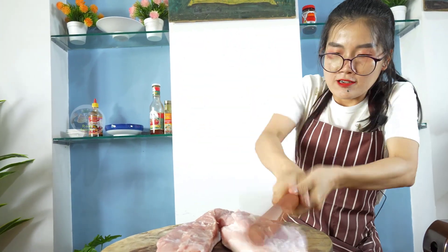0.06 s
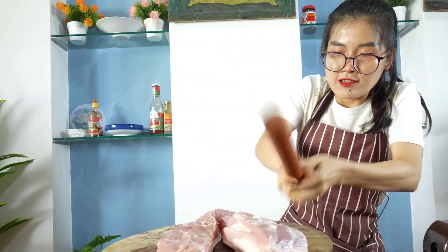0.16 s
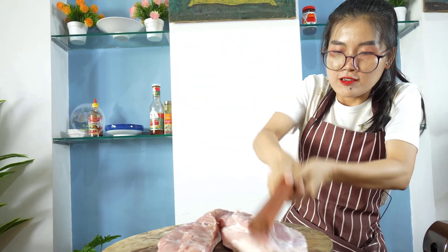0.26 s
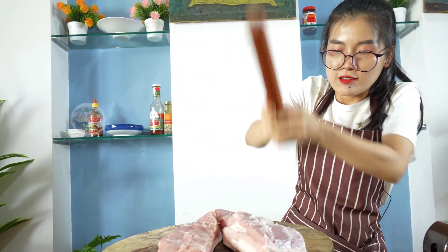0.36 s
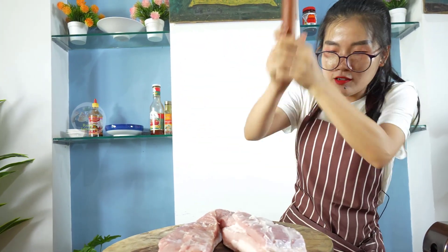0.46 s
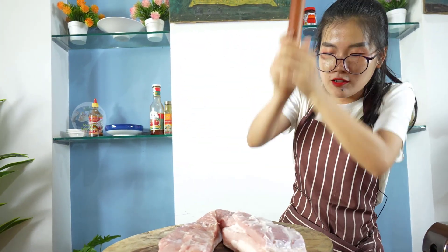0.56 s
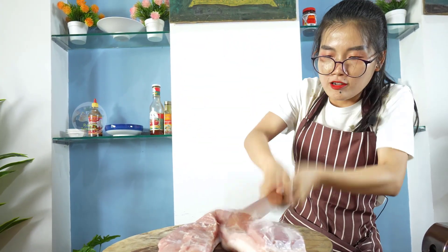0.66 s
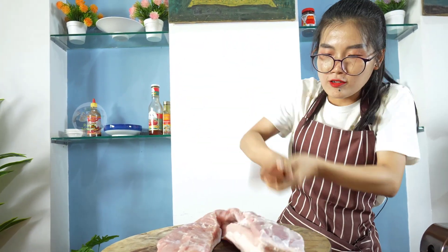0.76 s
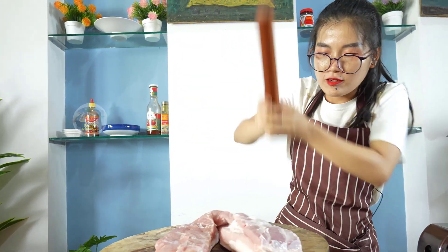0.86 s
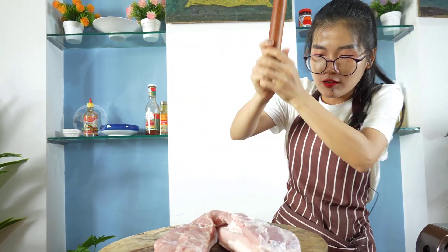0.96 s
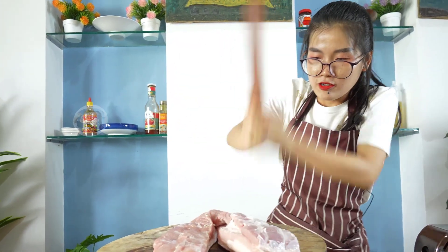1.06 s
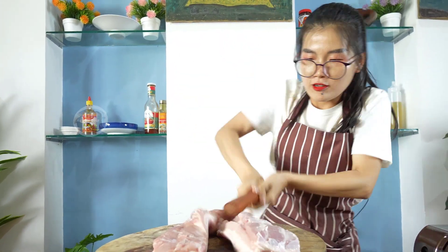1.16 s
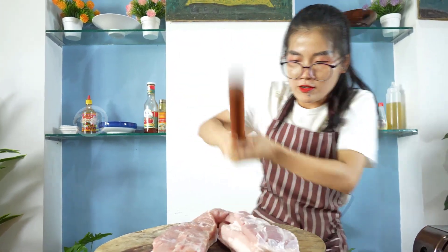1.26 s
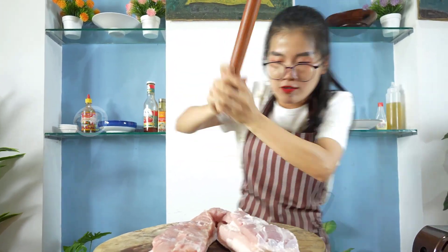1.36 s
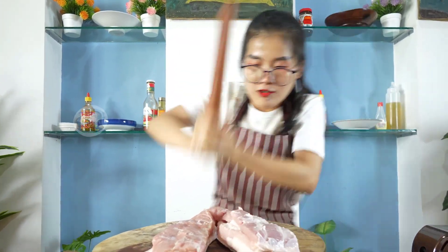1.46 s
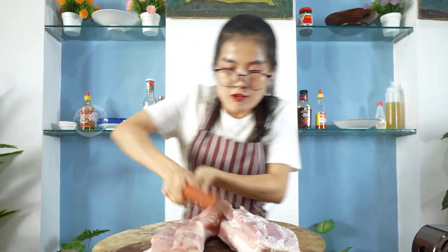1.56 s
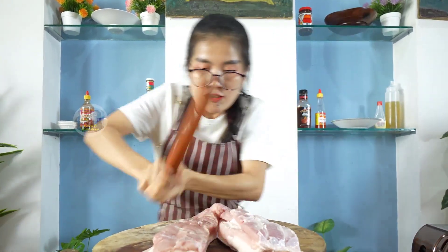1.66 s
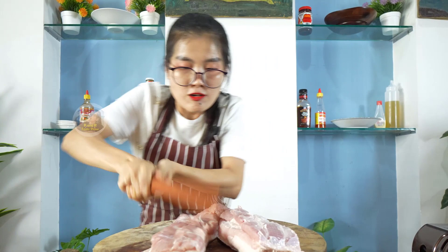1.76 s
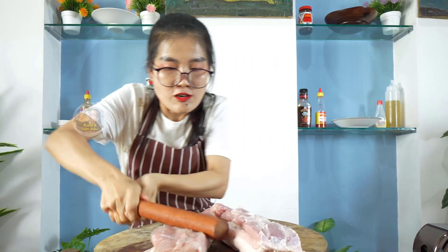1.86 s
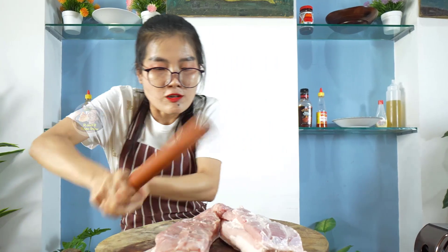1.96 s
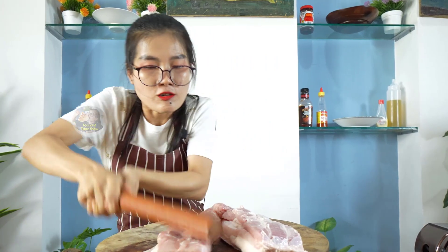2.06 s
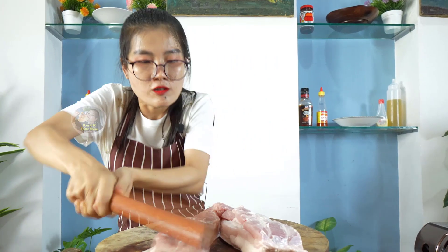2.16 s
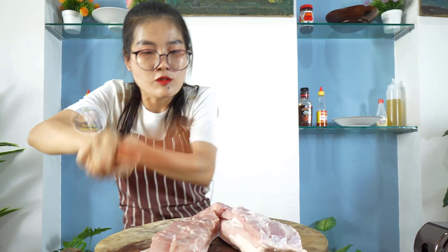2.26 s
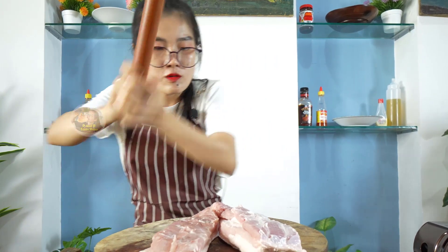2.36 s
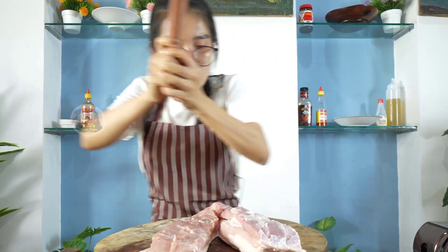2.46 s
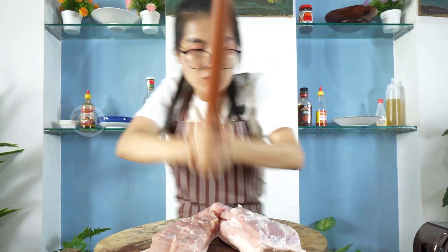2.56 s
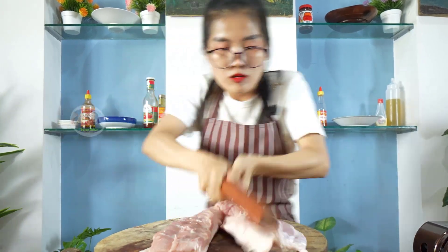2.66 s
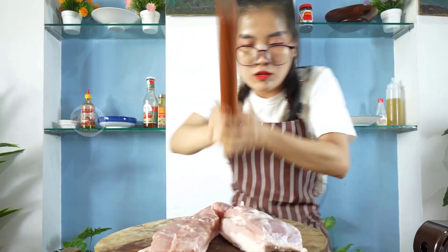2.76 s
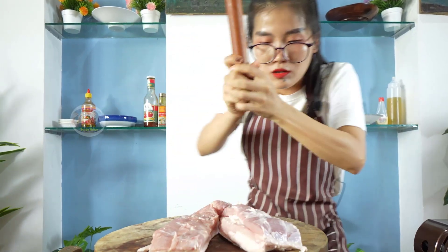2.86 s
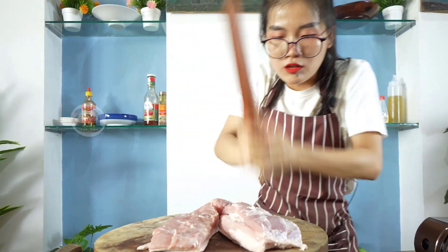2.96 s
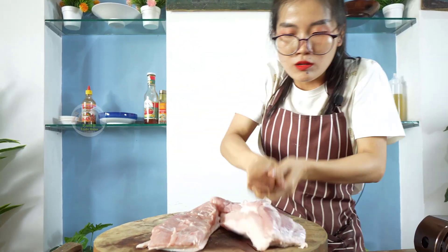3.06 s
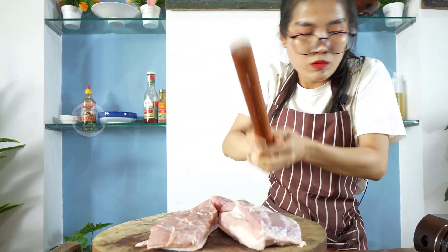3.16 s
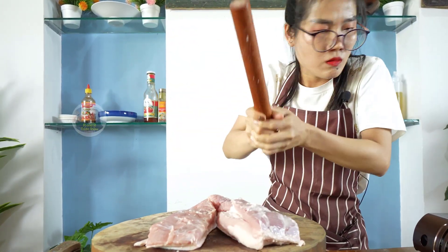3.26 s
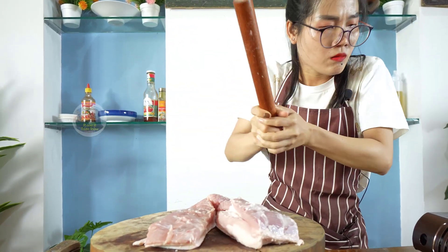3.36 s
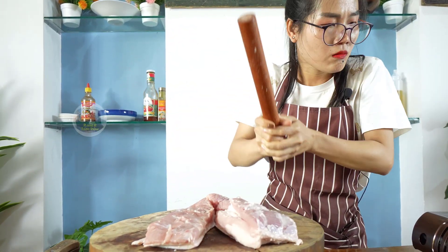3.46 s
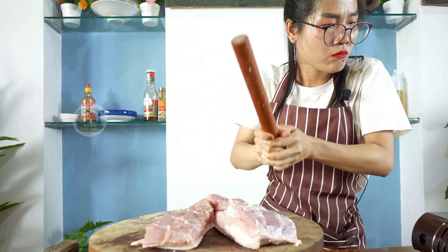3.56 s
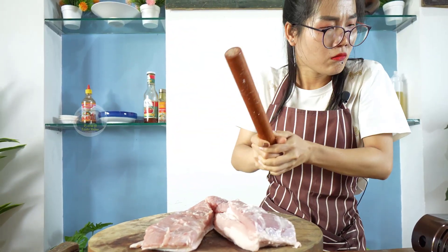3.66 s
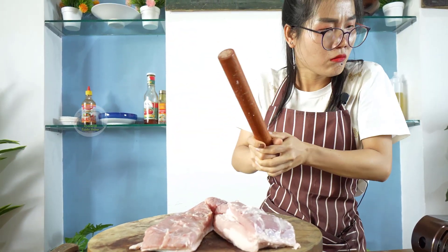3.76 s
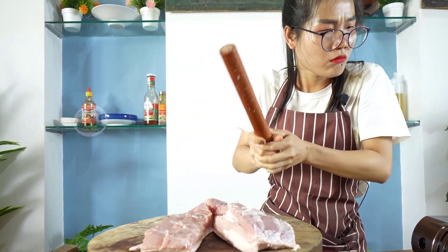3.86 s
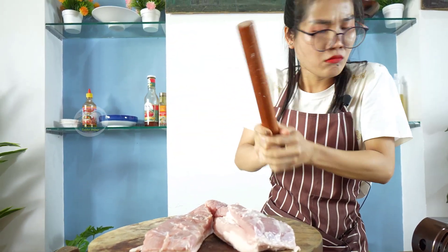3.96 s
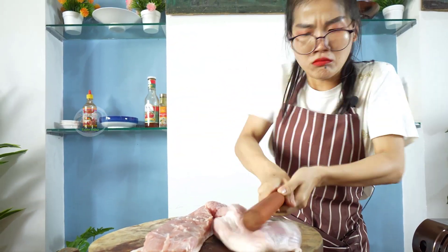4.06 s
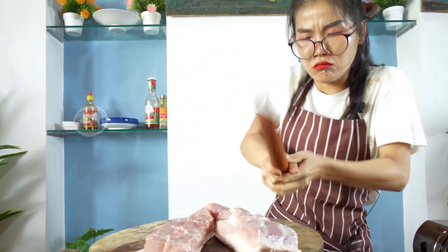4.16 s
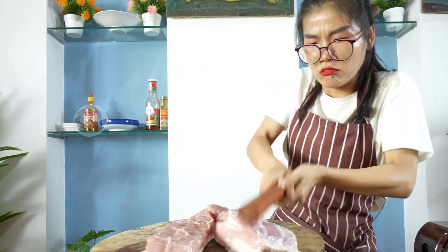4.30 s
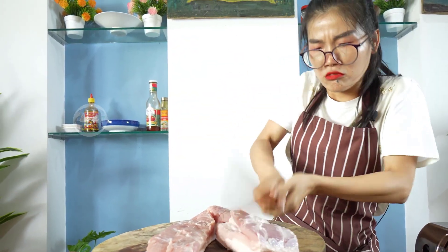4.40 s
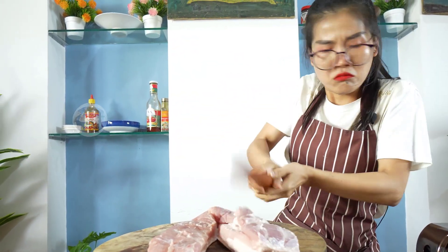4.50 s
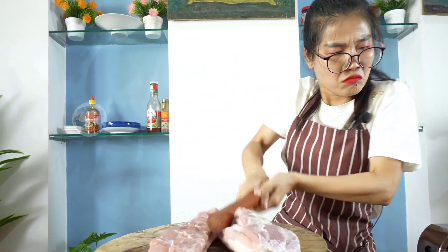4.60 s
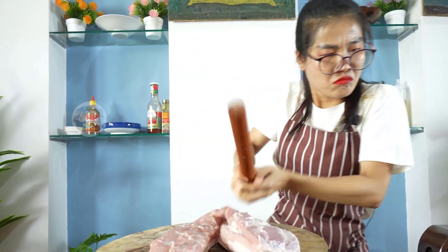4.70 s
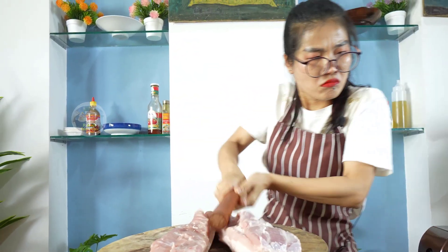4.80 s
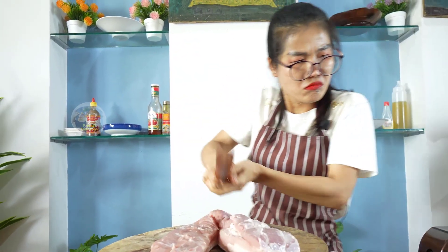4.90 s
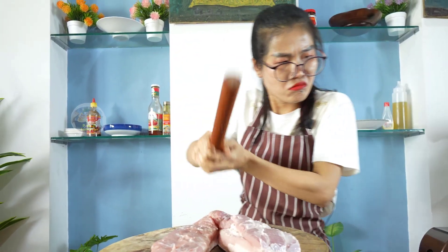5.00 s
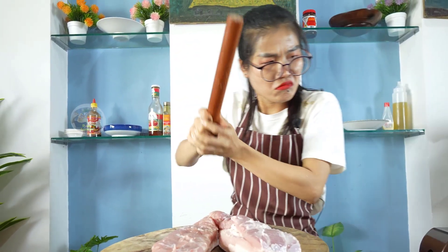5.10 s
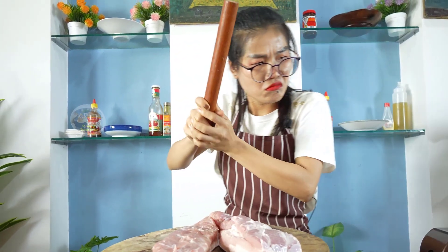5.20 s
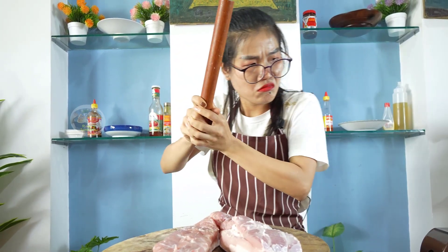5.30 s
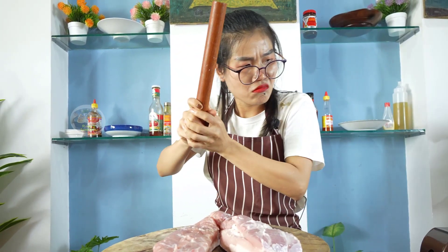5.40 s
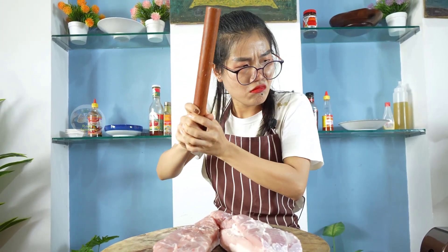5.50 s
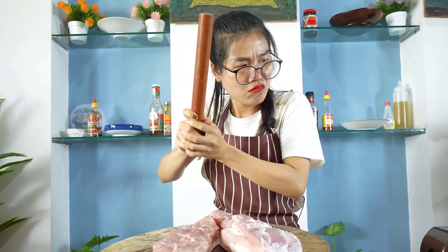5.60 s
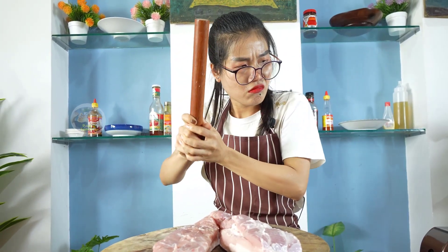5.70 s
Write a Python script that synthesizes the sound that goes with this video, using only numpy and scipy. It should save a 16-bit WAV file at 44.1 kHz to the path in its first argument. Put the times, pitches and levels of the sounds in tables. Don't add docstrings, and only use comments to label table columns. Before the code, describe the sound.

Wet, sharp slaps of a wooden pin on raw meat come in bursts, with a loose wooden block chattering and rattling in a tiled kitchen.

```python
import sys
import numpy as np
from scipy import signal
from scipy.fft import rfft, irfft, next_fast_len
from scipy.io import wavfile
from scipy.ndimage import map_coordinates

SR = 44100
rng = np.random.default_rng(int(sys.argv[2]) if len(sys.argv) > 2 else 0)


def waveform_to_disk(signal):
    frames = np.transpose(np.atleast_2d(signal))
    scaled = np.clip(frames, -1, 1) * 32767
    samples = np.round(scaled).astype(np.int16)
    wavfile.write(sys.argv[1], SR, samples)


def volts_from_decibels(level):
    exponent = np.asarray(level, float) / 20
    return 10 ** exponent


N = 253069


def unit(x):
    return x / np.sqrt(np.mean(x ** 2) + 1e-20)


def peak(x):
    return x / np.abs(x).max()


def add(track, s, sound):
    track[round(s * SR):][:len(sound)] += sound


def along(points, hz):
    f, v = np.transpose(points)
    return np.interp(np.log(hz + 1), np.log(f + 1), v, left=-120, right=-120)


def coloured(x, spectrum):
    m = next_fast_len(len(x) + 8192)
    gain = volts_from_decibels(along(spectrum, np.fft.rfftfreq(m, 1 / SR)))
    return unit(irfft(rfft(x, m) * gain, m)[:len(x)])


def below(x, hz):
    m = next_fast_len(N + 8192)
    return irfft(rfft(x, m) * (np.fft.rfftfreq(m, 1 / SR) < hz), m)[..., :N]


def ring(modes, t, attack, scatter_db, spread=.005):
    hz, db, t60 = np.transpose(modes)[:, :, None]
    chance = rng.standard_normal((2, len(modes), 1))
    decay = volts_from_decibels(db + scatter_db * chance[0] - 60 * t / t60)
    tones = decay * np.sin(2 * np.pi * hz * (1 + spread * chance[1]) * t)
    return tones.sum(axis=0) * (1 - np.exp(-t / attack))


def grains(fresh, per_s, spread_db, life, smooth):
    sizes = np.minimum(rng.exponential(size=N), 2.2)
    taps = (rng.random(N) < per_s / SR) * volts_from_decibels(spread_db * sizes)
    t = np.arange(SR // 40) / SR
    rubs = np.sqrt(np.abs(signal.fftconvolve(taps ** 2, volts_from_decibels(-120 * t / life))[:N]))
    power = fresh ** 2 * unit(rubs) ** 2 + 1 - fresh ** 2 + smooth ** 2
    return np.sqrt(power) * rng.standard_normal(N)


# time of the blow in seconds, strength in dB, rise in dB/s.
SWINGS = [
    (.7365, -4, 150),
    (1.1854, 0.5, 155.5),
    (1.5854, 1.5, 110.5),
    (2.677, 0.5, 155),
    (3.08, 2.5, 97),
    (4.125, -5, 252),
]
# chatter, boom, crunch and hiss in dB, swelling in seconds.
JOLTS = [(-38.5, -31, -30, -47, 0.055), (-31.5, -24.5, -32, -54, 0.073), (-38.5, -27, -26.5, -55, 0.11),
         (-25.5, -22, -26.5, -54.5, 0.11), (-21, -18, -22.5, -39, 0.079), (-27, -21.5, -24, -39, 0.076),
         (-22, -19, -25.5, -39.5, 0.052), (-23, -19, -28.5, -45.5, 0.076),
         (-24, -17.5, -24.5, -45.5, 0.069), (-25.5, -18.5, -32, -53.5, 0.054),
         (-22, -23.5, -23, -43.5, 0.091), (-23.5, -20.5, -19.5, -47, 0.12), (-40, -29, -28, -45.5, 0.053),
         (-31, -26, -30, -40, 0.072), (-35.5, -29.5, -33, -51, 0.034), (-38.5, -59, -41.5, -48.5, 0.083),
         (-34, -32.5, -34.5, -60, 0.084)]
# chatter, boom, crunch, hiss.
# Start below the top in dB; fall in dB/s; share of the swelling time (spray peaks early).
SWELL_DB = [7.3, 5.5, 0.79, 7.8]
FALL_DB_S = [97, 120, 110, 95]
SWELL_SHARE = [0.69, 0.86, 1, 0.34]
SWING_DB = [-44, -38, -44.5, -67]
REST_DB = [-74, -66, -76, -99.5]
LINGER_DB = [-12, -21.5, -40.5, -42]
LINGER_DB_S = [50, 50, 55.2, 95]


def shake(column):
    step = 32
    t, k = np.arange(0, N + step, step) / SR, column - 1
    calm = volts_from_decibels(2 * REST_DB[k])
    for s, db, rise in SWINGS:
        calm = calm + (t < s) * volts_from_decibels(2 * (SWING_DB[k] + db - rise * np.abs(t - s)))
    busy = np.zeros_like(t)
    earlier_s = -0.027
    for s, jolt in zip([earlier_s] + [row[0] for row in SLAPS], JOLTS):
        top_s = max(SWELL_SHARE[k] * jolt[-1], .005)
        swell = np.clip(1 - (t - s) / top_s, 0, 1)
        late = np.maximum(t - s - top_s, 0)
        power = (t >= s) * volts_from_decibels(2 * (jolt[k] - SWELL_DB[k] * swell))
        busy += power * volts_from_decibels(-2 * FALL_DB_S[k] * late)
        calm += power * volts_from_decibels(2 * (LINGER_DB[k] - LINGER_DB_S[k] * late))
    return [np.interp(np.arange(N) / SR, t, v) for v in (np.sqrt(busy + calm), busy / (busy + calm))]


# time in seconds, table boom in dB, rustle in dB.
STIRS = [
    (.56, -45.5, -71),
    (.64, -56.5, -46),
    (2.5, -42.5, -71.5),
    (2.999, -51, -64.5),
    (3.8, -58, -81),
    (3.95, -56.5, -77),
    (5.299, -59, -71),
    (5.54, -57.5, -78),
]
STIR_DB_S = [89.5, 297.5]


def stir(column):
    t = np.arange(N) / SR
    return sum(volts_from_decibels(row[column] - STIR_DB_S[column - 1] * np.abs(t - row[0])) for row in STIRS)


# frequency in Hz, density in dB per Hz.
HUM = [(13, -35), (22, -6.5), (76, -8.5), (109, -18.5), (140, -1), (165, -19.5), (242, -16), (356, -41.5),
       (602, -22), (653, -46), (1100, -38.5), (1580, -60.5), (16000, -82.5)]


def hum():
    level_db, wavers_db = -60, 4.5
    waver = map_coordinates(rng.standard_normal(40), [np.arange(N) * 6 / SR])
    return volts_from_decibels(level_db + 8.0 + wavers_db * waver) * coloured(rng.standard_normal(N), HUM)


# frequency in Hz, t60 in seconds.
KITCHEN = [(100, .5), (400, .3), (1000, .34), (3000, .3), (7000, .28), (14000, .26)]


def kitchen(x, decays, piece=.3):
    out, step = np.zeros(N + 2 * SR), round(piece * SR)
    for start in range(0, N, step):
        hz, t, z = signal.stft(rng.standard_normal(SR * 3 // 4), SR, nperseg=256)
        t60 = along(decays, np.clip(hz, decays[0][0], decays[-1][0]))
        tail = signal.istft(z * volts_from_decibels(-60 * t / t60[:, None]), SR, nperseg=256)[1]
        echo = signal.fftconvolve(x[start:start + step], tail / np.linalg.norm(tail))
        add(out, start / SR + .006, echo)
    return out[:N]


# frequency in Hz, width in Hz, level in dB.
DISHES = [(900, 180, -7), (1580, 99, -13.5), (2250, 100, -11), (2580, 130, -8), (3050, 180, -4),
          (3270, 140, -4.5), (3587, 50, -3), (4310, 130, -2), (4560, 80, -4), (5330, 80, -7),
          (6600, 120, -9.5), (7200, 100, -10)]
# frequency in Hz, t60 in seconds.
DISH_RING = [(100, .5), (900, 0.46), (2400, 0.45), (3300, .52), (4400, 0.39), (5500, 0.36), (14000, 0.31)]


def dishes(shaken):
    m = next_fast_len(N + 8192)
    f = np.fft.rfftfreq(m, 1 / SR)
    bands = sum(volts_from_decibels(db) / (1 + (2 * (f - hz) / width) ** 2) for hz, width, db in DISHES)
    return volts_from_decibels(-4.5) * kitchen(irfft(rfft(shaken, m) * bands, m)[:N], DISH_RING)


# frequency in Hz, density in dB per Hz.
BOOM = [(13, -52.5), (22, -8.5), (43, -18), (88, -3), (110, -8.5), (133, 0), (160, -10), (247, -5),
        (330, -7), (420, -8.5), (474, -0.5), (540, -9.5), (700, -13.5), (1000, -100)]
RUMBLE = [(13, -39.5), (25, -7.5), (60, -0.5), (130, 0), (220, -8), (320, -18), (600, -60)]


def table():
    boom = shake(column=2)[0] * volts_from_decibels(-3.5) * coloured(rng.standard_normal(N), BOOM)
    return boom + stir(column=1) * coloured(rng.standard_normal(N), RUMBLE)


# start in seconds, peak in dB, frequency in Hz.
BUMPS = [(.141, -27, 70), (0.738, -22, 67), (1.19, -46.5, 90), (1.589, -27, 90), (1.776, -24.5, 110),
         (1.93, -15, 110), (2.083, -18.5, 130), (2.241, -14, 150), (2.679, -25, 70), (3.086, -23, 90),
         (4.127, -27, 70), (4.313, -30, 70), (5.503, -40, 40.2)]


def bumps():
    out, t = np.zeros(N + SR), np.arange(SR // 8) / SR
    cycles = 1.3
    for s, db, hz in BUMPS:
        swing = ring([(hz, 0, 2 * cycles / hz)], t, attack=0.0025, scatter_db=0)
        add(out, s, -volts_from_decibels(db) * peak(swing))
    return out[:N]


# frequency in Hz, density in dB per Hz.
SWISH = [(3500, -41), (5500, -1.5), (7000, -3.5), (10000, -7), (13000, -14), (15600, -17), (16000, -80)]
# start in seconds, peak in dB.
SPITS = [(0.214, -24), (0.295, -27.5), (0.6275, -48), (1.8088, -41.5), (2.6925, -21.5), (2.7274, -22),
         (3.0835, -18), (3.12, -38), (3.137, -22.5), (3.1767, -20.5), (3.2156, -18), (4.3441, -41)]


def swish():
    out, t = np.zeros(N + SR), np.arange(SR // 8) / SR
    for s, db in SPITS:
        envelope = (1 - np.exp(-t / 0.0011)) * volts_from_decibels(-60 * t / 0.063)
        puff = envelope * coloured(rng.standard_normal(len(t)), SWISH)
        add(out, s, volts_from_decibels(db - 2.0) * peak(puff))
    gain, fresh = shake(column=4)
    spray = grains(fresh, per_s=320, spread_db=3.5, life=.03, smooth=1.7)
    return out[:N] + gain * volts_from_decibels(5.5) * coloured(spray, SWISH)


# frequency in Hz, density in dB per Hz.
CRUNCH = [(350, -43.5), (550, -3), (1200, 2), (1800, -4.5), (2500, -1.5), (3600, -4.5), (3900, -10),
          (4500, -10.5), (5200, -16), (7500, -21), (10000, -36)]


def crunch():
    gain, fresh = shake(column=3)
    crackle = grains(fresh, per_s=350, spread_db=3.5, life=0.04, smooth=0.39)
    return (gain + stir(column=2)) * volts_from_decibels(-4.5) * coloured(crackle, CRUNCH)


# frequency in Hz, density in dB per Hz.
CHATTER = [(300, -48), (520, -11), (680, -3.5), (780, -1.5), (900, -4), (1020, -4.5), (1150, -2.5),
           (1500, -5), (2200, -12.5), (3500, -33), (6000, -71.5)]


def chatter():
    gain, fresh = shake(column=1)
    contacts = grains(fresh, per_s=680, spread_db=-2.0, life=0.0099, smooth=0.21)
    return gain * volts_from_decibels(1.0) * coloured(contacts, CHATTER)


# frequency in Hz, level in dB, t60 in seconds.
BLOCK_LOW = [(488, -7, 0.015), (770, -8.5, 0.056), (825.2, 0.5, 0.05), (899, 2, 0.041),
             (959.7, -0.5, 0.048), (1040, -4, .03), (1124, -4, 0.019), (1370, -11.5, 0.025),
             (1611, -8.5, 0.041)]
BLOCK_HIGH = [(2370, -16, 0.0043), (2472, -0.5, 0.021), (3080, -8.5, 0.022), (3561, -9, 0.044),
              (4292, -4.5, 0.021), (4586, -9.5, 0.039), (5213, -13.5, 0.039), (6000, -27, 0.017),
              (6700, -17, 0.028), (7970, -25.5, 0.039), (9050, -24, 0.028)]
# frequency in Hz, density in dB per Hz.
EDGE = [(700, -38), (1500, 0.5), (3000, 0), (5000, -10.5), (6000, -22.5), (7000, -19.5), (10000, -32),
        (12000, -41), (15500, -47), (16000, -88.5)]
# start in seconds, peak in dB, upper modes in dB re peak, favoured body pitch in Hz.
LANDINGS = [(0.046, -24.5, -13, 791), (0.058, -13, -11.5, 880), (0.1, -30.5, 1.5, 805),
            (0.152, -20.5, -12.5, 956), (0.167, -13, -21.5, 895), (0.186, -15.5, -10.5, 810),
            (0.198, -11, -14, 900), (0.217, -8, -9, 800), (0.253, -15, -4, 810), (0.289, -21, -16, 783),
            (0.309, -12.5, -25, 766), (0.325, -17, -19, 721), (0.34, -18.5, -17, 877), (0.355, -11, -8, 799),
            (0.369, -17.5, -5.5, 896), (0.378, -14, -16.5, 891), (0.4, -10, -11.5, 816), (0.432, -16, -23, 797),
            (0.466, -23, -10, 888), (0.491, -20.5, -11.5, 810), (0.518, -25.5, -14.5, 865),
            (0.75, -17, -13, 780), (0.763, -9.5, -5.5, 775), (0.783, -12, -7.5, 790),
            (0.803, -10.5, -27.5, 940), (0.816, -19.5, -19, 766), (0.846, -9, -15.5, 870),
            (0.864, -14, -17, 790), (0.889, -18, -18, 789), (0.908, -17, -15, 764), (0.936, -25, -14.5, 850),
            (0.957, -12.5, -12.5, 760), (0.992, -16.5, -16.5, 802), (1.026, -16, -17, 810),
            (1.2, -23.5, -8, 770), (1.214, -12, -10.5, 780), (1.224, -14.5, -8.5, 915),
            (1.235, -15.5, -11, 848), (1.249, -20.5, -11.5, 818), (1.263, -14, -14, 767),
            (1.289, -19.5, -23, 805), (1.289, -19, -16, 880), (1.312, -14.5, -19.5, 727),
            (1.335, -16.5, -15.5, 825), (1.347, -14.5, -12.5, 770), (1.376, -22, -16, 844),
            (1.399, -15.5, -9, 813), (1.415, -23.5, -18, 877), (1.434, -22, -20, 756),
            (1.452, -24.5, -22, 1020),
            (1.599, -25, -16, 996), (1.613, -12, -9.5, 799), (1.623, -9, -22.5, 800),
            (1.636, -14.5, -14.5, 1110), (1.65, -14, -21.5, 770), (1.661, -12, -6, 770),
            (1.694, -11.5, -14, 900), (1.707, -20.5, -13, 931), (1.736, -16, -7, 870),
            (1.764, -16.5, -8.5, 805), (1.783, -19, -20.5, 721), (1.793, -13, -21.5, 727),
            (1.805, -9.5, -11.5, 1040), (1.814, -7.5, -20, 797), (1.839, -14, -11.5, 778),
            (1.849, -11.5, -13, 834), (1.86, -17, -10.5, 770), (1.889, -15.5, -9.5, 796),
            (1.938, -6, -24, 985), (1.951, -23, -14, 791), (1.962, -7.5, -20, 1000),
            (1.977, -11, -11.5, 945), (2.002, -16.5, -18, 773), (2.015, -14.5, -16, 902),
            (2.043, -16.5, -19.5, 829), (2.066, -10, -14.5, 930), (2.088, -11, -21, 880),
            (2.099, -12.5, -26.5, 773), (2.111, -8.5, -19, 1020), (2.119, -12, -21, 1090),
            (2.119, -9.5, -13, 790), (2.15, -7, -19.5, 900), (2.165, -6, -27.5, 759),
            (2.193, -10, -17.5, 767), (2.225, -12, -15, 780), (2.247, -9, -16.5, 810),
            (2.267, -16.5, -22.5, 894), (2.279, -18.5, -21, 797), (2.29, -14, -23.5, 760),
            (2.305, -13, -13, 759), (2.319, -16.5, -16, 762), (2.344, -15, -13, 780),
            (2.375, -20, -10, 937), (2.4, -23, -17.5, 740), (2.418, -17, -17, 939),
            (2.453, -28, -18.5, 939), (2.515, -31, -25, 770), (2.535, -24, -29, 958),
            (2.69, -19.5, -3.5, 852), (2.705, -9, -4.5, 812), (2.726, -16.5, -1.5, 813),
           (2.733, -12, 0, 733), (2.745, -14, -1.5, 860), (2.76, -16, -8, 1040), (2.772, -14.5, -3.5, 1000),
           (2.787, -16, -4, 956), (2.812, -24, -20.5, 942), (2.828, -18, -2.5, 935),
           (2.855, -13.5, -16, 913), (2.9, -17.5, -12.5, 810), (2.931, -17, -11.5, 943),
           (2.965, -18, -9.5, 848), (3.01, -29.5, -16, 802), (3.093, -13.5, -1.5, 982),
           (3.119, -18, 4, 776), (3.138, -11, -1.5, 727), (3.148, -20, -6, 967), (3.165, -16, -12, 976),
           (3.178, -20, 6.5, 874), (3.194, -19.5, -0.5, 974), (3.213, -20, -4.5, 985),
           (3.231, -25, -13, 976), (3.246, -15.5, -17.5, 956), (3.27, -22, -14.5, 968),
           (3.304, -15, -11, 952), (3.336, -19, -9, 877), (3.372, -21.5, -13, 872),
           (3.415, -23.5, -14, 952),
            (4.153, -8, -8, 970), (4.177, -18.5, -4.5, 980), (4.191, -9, -12.5, 995), (4.237, -15.5, -5, 820),
          (4.268, -15, -9.5, 861), (4.3, -17, -8, 792), (4.338, -12.5, -8, 770), (4.365, -15, -5.5, 984),
          (4.383, -8.5, -9.5, 830), (4.396, -12.5, -3, 982), (4.407, -26.5, -7, 878),
          (4.426, -13.5, -5, 843), (4.464, -16, -2, 821), (4.492, -9, -6.5, 984), (4.532, -9.5, -6.5, 848),
          (4.579, -12, -6.5, 837), (4.608, -19, -5, 801), (4.642, -19, -8, 824), (4.697, -15, -3.5, 825),
          (4.74, -16.5, -7.5, 821), (4.801, -16.5, -1, 839), (4.879, -11.5, -5, 847),
          (4.926, -11.5, -4.5, 828), (4.962, -16.5, -4.5, 754), (5.024, -20, -10, 875),
            (0.832, -19, -6.5, 852),
    (.874, -19.5, -6.5, 849),
    (1.300, -19.5, -8.5, 850),
    (2.128, -15.5, -11, 844),
    (4.205, -21, -9.5, 900),
    (4.816, -25, -8.5, 900),
    (4.893, -18.5, -7.5, 946),
    (4.938, -22.5, -12, 947),
]


def knocks():
    out, t = np.zeros(N + SR), np.arange(SR // 14) / SR
    grit = coloured(rng.standard_normal(N + SR), EDGE)
    favour_db = 18
    for s, db, hard_db, body_hz in LANDINGS:
        struck = [(hz, level - favour_db * abs(np.log2(hz / body_hz)), t60) for hz, level, t60 in BLOCK_LOW]
        body = ring(struck * 2, t, attack=0.0022, scatter_db=6.5, spread=0.018)
        envelope = 0.84 * volts_from_decibels(-60 * t / 0.022) * np.clip(t / .0008, 0, 1)
        click = envelope * grit[round(s * SR):][:len(t)]
        edge = ring(BLOCK_HIGH * 2, t, attack=.0022, scatter_db=2.5, spread=.01) / 1.4 + click
        add(out, s, volts_from_decibels(db - 1.0) * peak(body) + volts_from_decibels(db + hard_db + 4.0) * peak(edge))
    return out[:N]


# start in seconds, peak in dB, frequency in Hz.
POCKETS = [(0.1366, -4.5, 2590), (0.28, -4, 3040), (0.7372, -4.5, 2090), (1.5867, -4, 6800),
           (1.7732, -5.5, 1880), (2.0765, -5.5, 1470), (3.0814, -7.5, 1332), (4.1246, -8.5, 1386),
           (4.308, -8.5, 8730), (4.6283, -8.5, 1330), (2.2378, -14, 6600), (4.1245, -13, 4900),
           (4.3086, -11, 6400), (2.6765, -8, 2000)]


def pockets():
    out, t = np.zeros(N + SR), np.arange(SR // 40) / SR
    level_db, t60_s = -8, .008
    for s, db, hz in POCKETS:
        pop = ring([(hz, 0, t60_s)], t, attack=0.0021, scatter_db=0)
        add(out, s, volts_from_decibels(db + level_db) * peak(pop))
    return out[:N]


# start in seconds, peak in dB, middle band in dB re peak, airy band in dB re
# peak, table thump in dB.
SLAPS = [(0.137, -19.5, -5, -3, -29.5), (0.2804, -21, -9, -9, -26), (0.7365, -16, -2.5, 2, -49),
         (1.186, -9.5, -8.5, -5.5, -48.5), (1.5866, -6, -13, -10.5, -41), (1.773, -10, -10, -3, -48.5),
         (1.9254, -8.5, -10, -4, -37), (2.0781, -11, -20, -5.5, -22), (2.2381, -16.5, -11, 1, -26.5),
         (2.6763, -9, -6.5, -14, -27), (3.08, -12, -6.5, -13.5, -23), (4.124, -10.5, -13.5, -6, -30),
         (4.308, -14, -9, -2.5, -33.5), (4.4645, -24.5, -15, -5.5, -41), (4.631, -16.5, -5, 3.5, -63),
         (4.8063, -17.5, -2.5, -4.5, -61.5)]
PRESS_DB = [-40.5, -25, -25, -37.5, -34.5, -19.5, -17.5, -13, -17, -24.5, -13.5, -64, -42.5, -45, -64,
            -28.5]
# frequency in Hz, density in dB per Hz.
SLAP_TOP = [(3000, -50), (4200, -4), (5200, 4), (7000, 9.5), (8800, 0), (10500, -13.5), (13000, -68)]
SLAP_MID = [(300, -32.5), (900, 4.5), (1500, -6.5), (2500, 1), (4000, -7.5), (5500, -37), (8000, -59)]
SLAP_AIR = [(6500, -67), (8500, -6), (10500, 1), (13000, -8.5), (16200, -20), (17000, -68.5)]
# frequency in Hz, level in dB, t60 in seconds.
TABLE = [(96, -5.5, 0.17), (137, -24, 0.24), (180, 0.5, 0.021), (245, -13.5, 0.11)]
THUD = [(277, -2.5, 0.031), (370, -1, 0.07), (481, -3.5, 0.16), (593, 0, 0.072)]


def slaps():
    near, far, t = np.zeros(N + SR), np.zeros(N + SR), np.arange(SR // 3) / SR
    rise = 1 - np.exp(-(t / 0.00041) ** 2)
    snap = rise * (volts_from_decibels(-60 * t / 0.0025) + volts_from_decibels(-29 - 60 * t / 0.02))
    smack = rise * (volts_from_decibels(-60 * t / 0.021) + volts_from_decibels(-31.0 - 60 * t / 0.027))
    spike = 1. * (np.arange(len(t)) == 64)
    pop_top, pop_mid, pop_air = (coloured(spike, c) for c in (SLAP_TOP, SLAP_MID, SLAP_AIR))
    for (s, db, mid_db, air_db, thump_db), thud_db in zip(SLAPS, PRESS_DB):
        top, mid, air = (coloured(rng.standard_normal(len(t)), c) for c in (SLAP_TOP, SLAP_MID, SLAP_AIR))
        crack = peak(snap * top) + volts_from_decibels(air_db + 4.0) * peak(snap * air)
        crack += volts_from_decibels(mid_db + 6.0) * peak(smack * mid)
        add(near, s + 0.00035, volts_from_decibels(db + 2.0) * crack)
        pop = pop_top + volts_from_decibels(air_db) * pop_air + volts_from_decibels(mid_db - 3.0) * pop_mid
        add(far, s, volts_from_decibels(db - 57.5) * pop)
        thump = ring(TABLE, t, attack=.006, scatter_db=2)
        add(near, s + .003, volts_from_decibels(thump_db + 4) * peak(thump))
        thud = ring(THUD, t, attack=0.0054, scatter_db=5)
        add(near, s + .005, volts_from_decibels(thud_db + 3.5) * peak(thud))
    return near[:N], far[:N]


# frequency in Hz, level in dB.
ECHO_COLOUR = [(20, -3.5), (900, 2.5), (2000, 0), (3400, -6.5), (3900, -6.5), (4400, 2.5), (5000, -8),
               (20000, -14)]


def scene():
    near, far = slaps()
    block, tremble = knocks(), chatter() + crunch()
    sent = volts_from_decibels(-12) * block + volts_from_decibels(-10) * tremble
    returned = volts_from_decibels(1.5) * np.std(sent) * coloured(sent, ECHO_COLOUR)
    room = kitchen(volts_from_decibels(13.0) * far + returned, KITCHEN)
    shaken = tremble + table() + bumps() + dishes(block + tremble)
    return (near + below(block + room, 15700) + shaken + swish() + hum() + pockets())[None]


def low_pass(x):
    return signal.sosfilt(signal.butter(12, 16820, fs=SR, output="sos"), x)


def record(dry):
    top, knee = .68, 6
    rounded = dry / (1 + np.abs(dry / top) ** knee) ** (1 / knee)
    mix = below(rounded, 16800)
    return low_pass(mix)


dry = scene()
out = record(dry)
waveform_to_disk(out)
```